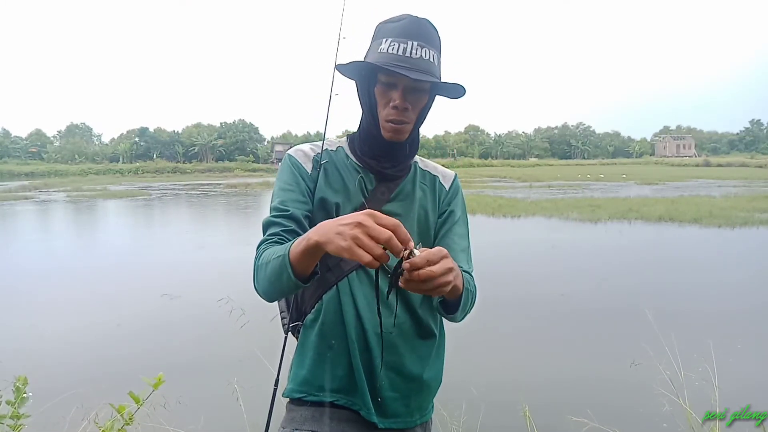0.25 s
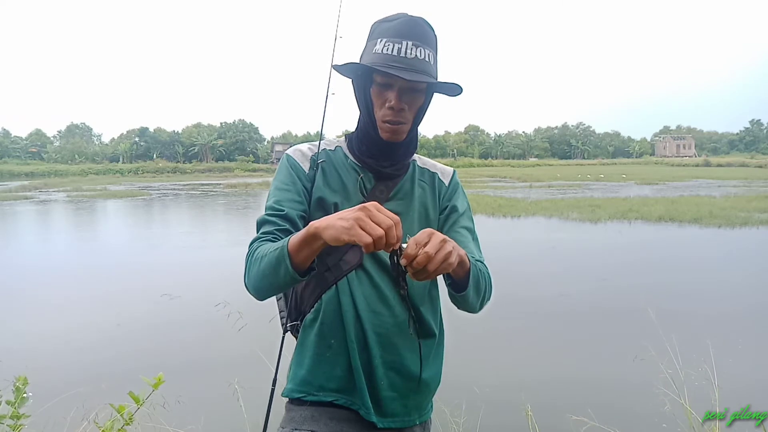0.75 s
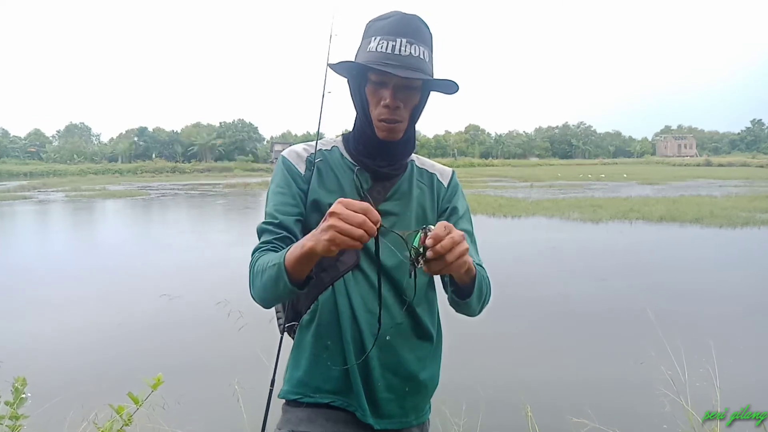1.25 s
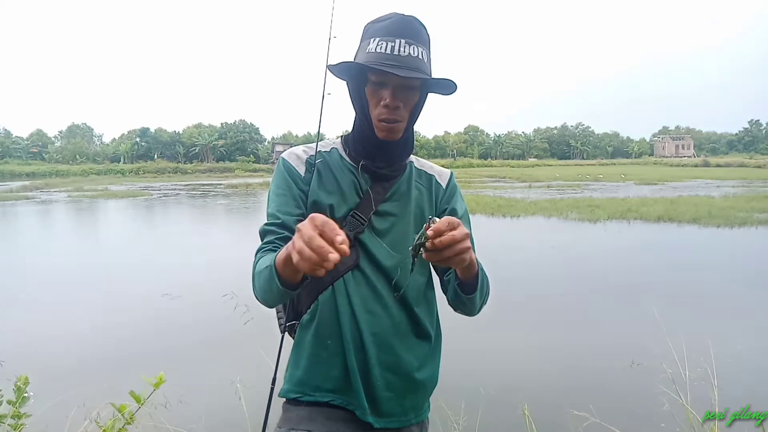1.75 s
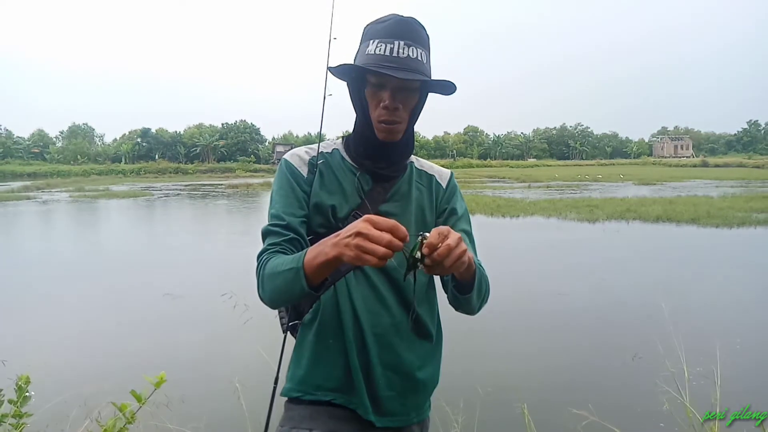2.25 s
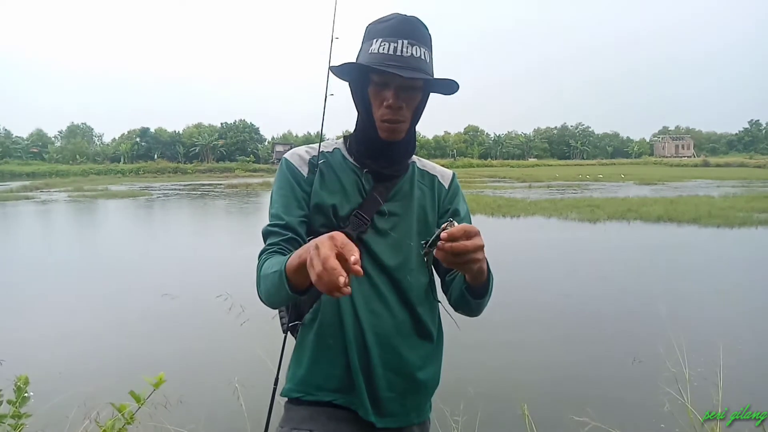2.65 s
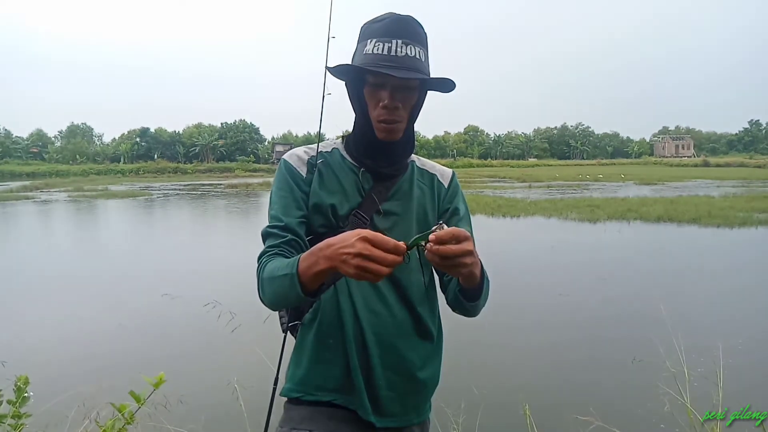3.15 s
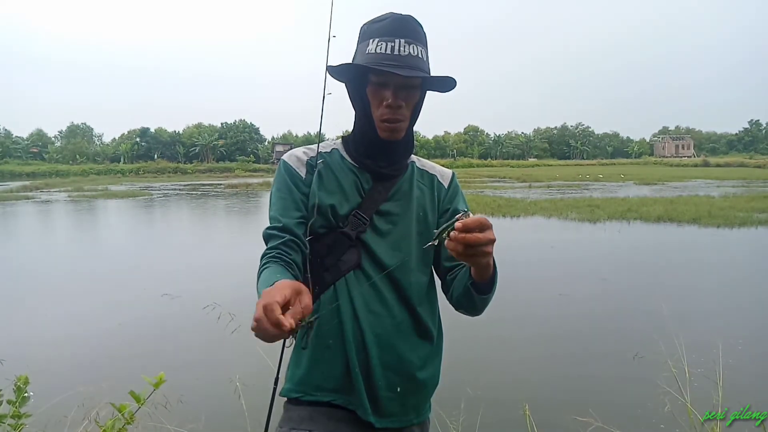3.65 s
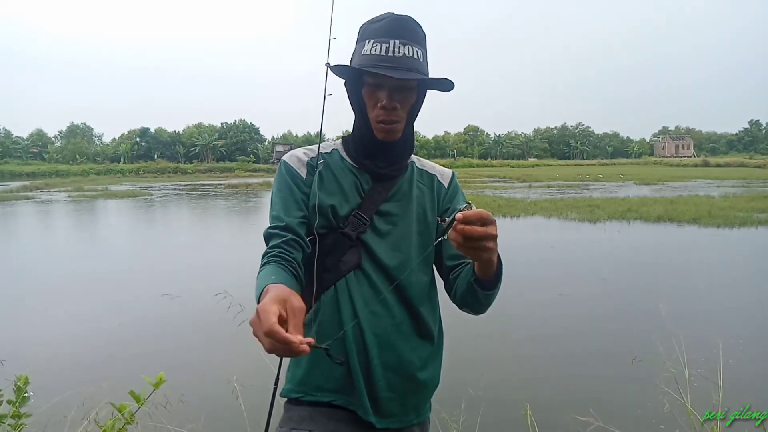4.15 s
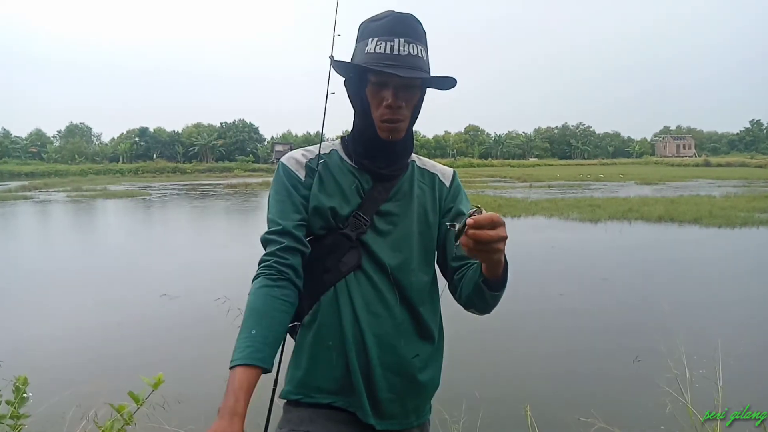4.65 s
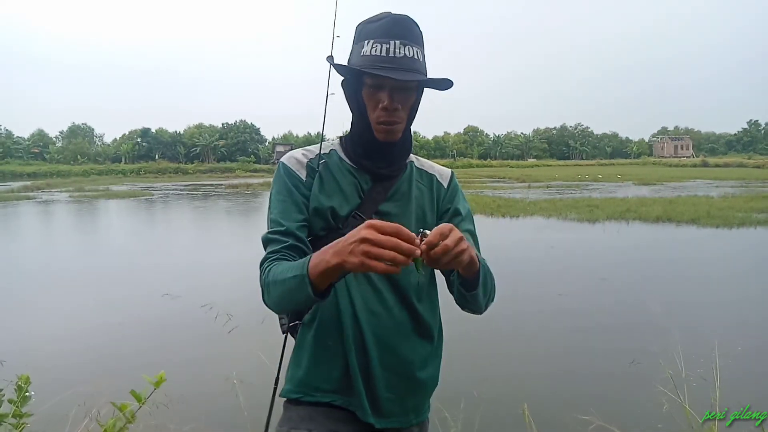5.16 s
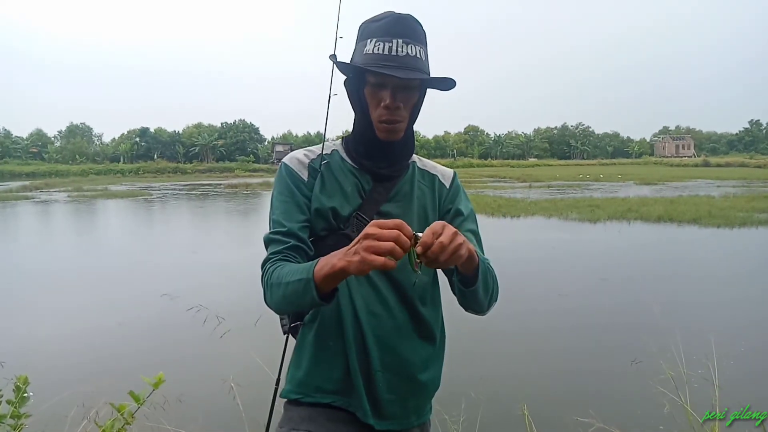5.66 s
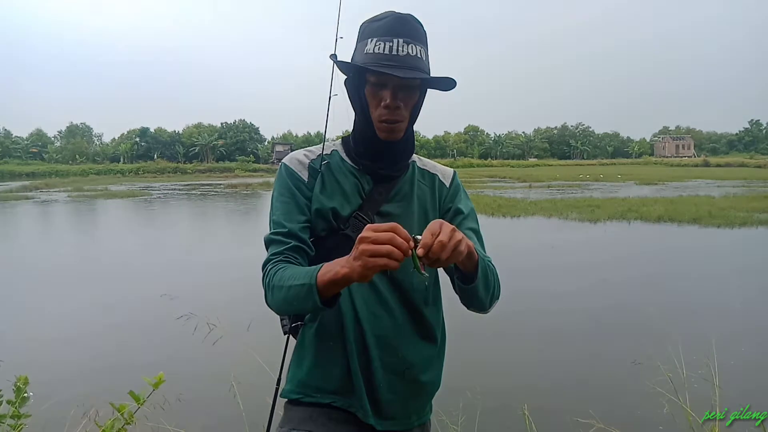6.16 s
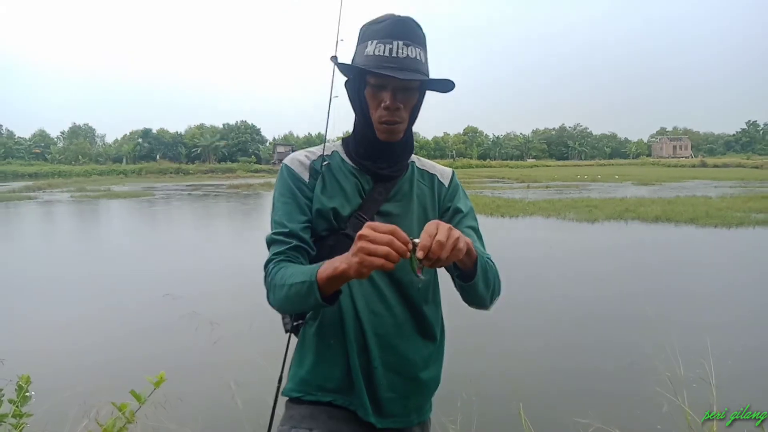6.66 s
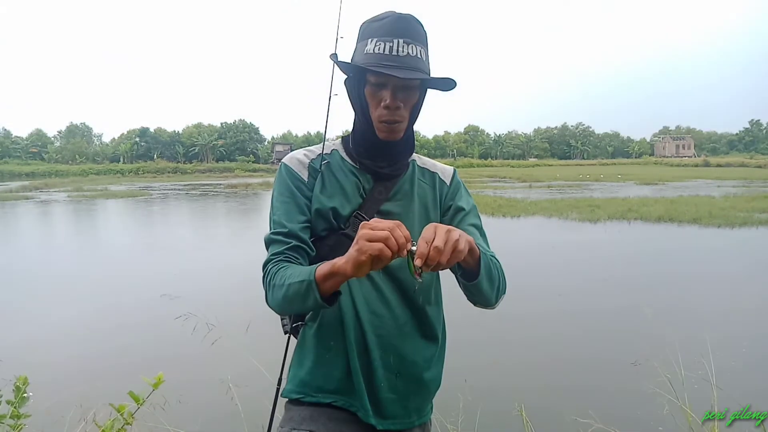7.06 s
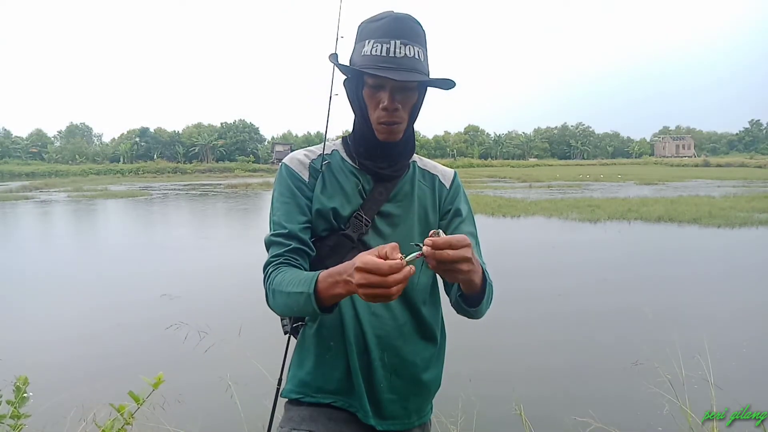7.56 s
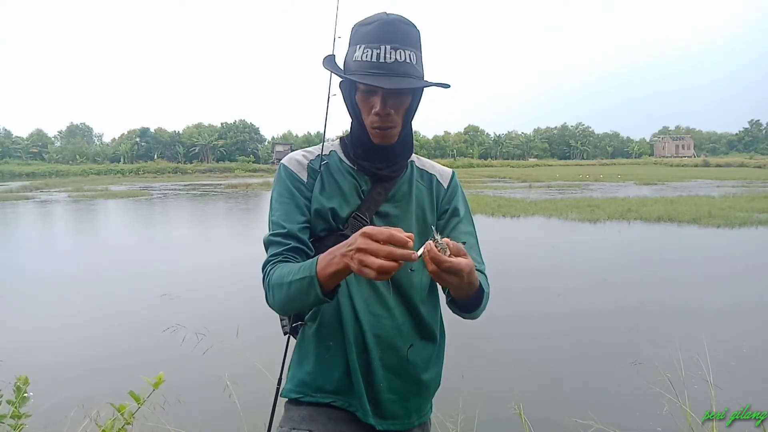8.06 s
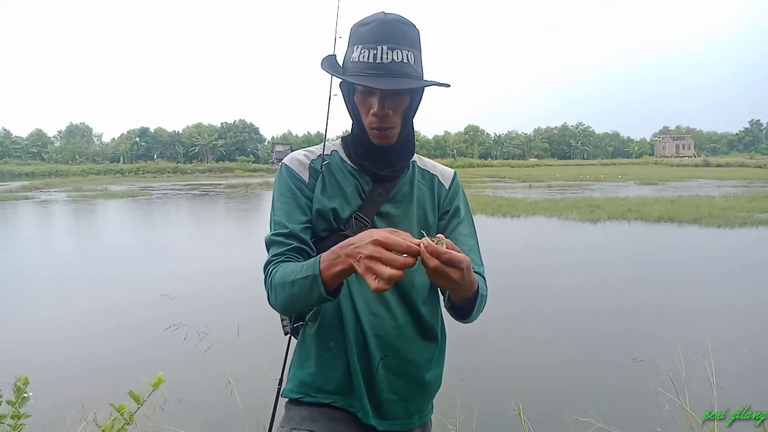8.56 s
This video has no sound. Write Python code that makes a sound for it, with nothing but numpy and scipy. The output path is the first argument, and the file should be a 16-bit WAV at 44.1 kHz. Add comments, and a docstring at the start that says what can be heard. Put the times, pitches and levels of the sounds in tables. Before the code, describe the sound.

Outdoors beside a pond, the nearest bird gives a long gliding whistle that rises at its end, answered by two quick dropping notes, about every 1.2 seconds. Between these, another bird chirps an arched note and an echoing rise and fall. A cricket trills in short runs over a thin high insect chorus. Low wind rumbles with occasional soft thumps at the microphone, and faint clicks and taps come from handled fishing tackle.

```python
"""Birdsong beside a pond

Birds, gliding sine tones with a noise-tail echo off the bank: a long swooping whistle answered by two quick
falling notes, arched notes that run on into a rise and fall or a twit, and one faint mew. A near cricket chirps in
paired tone strokes, mostly in runs that start slowly, over a far insect chorus of band-filtered noise.
Low wind rumbles as patchy noise with buffets; fishing tackle clicks and taps in the hands as short noise bursts."""
import sys
import numpy as np
from scipy import signal
from scipy.fft import rfft, irfft, next_fast_len
from scipy.io import wavfile
from scipy.ndimage import uniform_filter1d, map_coordinates

SR = 44100
rng = np.random.default_rng(int(sys.argv[2]) if len(sys.argv) > 2 else 0)


def waveform_to_disk(signal):
    """Save audio, clipped to [-1, 1], as 16-bit WAV at the path in sys.argv[1]."""
    frames = np.transpose(np.atleast_2d(signal))
    scaled = np.clip(frames, -1, 1) * 32767
    samples = np.round(scaled).astype(np.int16)
    wavfile.write(sys.argv[1], SR, samples)


N = 388521


def amp(db):
    """Decibels to gain."""
    return 10 ** (np.asarray(db) / 20)


def unit(x):
    """Scale to rms 1."""
    return x / np.sqrt(np.mean(x ** 2) + 1e-20)


def add(track, start_s, sound):
    """Mix a sound into the track in place, cropped to the track."""
    start = round(start_s * SR)
    sound = sound[max(0, -start):]
    place = track[max(0, start):][:len(sound)]
    place += sound[:len(place)]


def level(rows):
    """Gain per sample, interpolated in dB from (time [s], level [dB]) rows."""
    time_s, db = np.transpose(rows)
    return amp(np.interp(np.arange(N) / SR, time_s, db))


def wobble(rate_hz, size):
    """Smooth random curve: a spline through normal random knots at rate_hz."""
    knots = rng.standard_normal(int(size * rate_hz / SR) + 4)
    return map_coordinates(knots, [np.arange(size) * rate_hz / SR])


def coloured(x, spectrum):
    """Filter by (frequency [Hz], gain [dB]) points on a log-frequency axis."""
    size = next_fast_len(len(x) + 8192)
    hz, db = np.transpose(spectrum)
    bins_hz = np.fft.rfftfreq(size, 1 / SR)
    gain = amp(np.interp(np.log(bins_hz + 1), np.log(hz), db))
    return irfft(rfft(x, size) * gain, size)[:len(x)]


def rush(spectrum, patchy_db):
    """Coloured noise of rms 1 with brief time-frequency patches of random gain."""
    z = signal.stft(rng.standard_normal(N), nperseg=1024)[2]
    field = uniform_filter1d(rng.standard_normal(z.shape), size=4, axis=0)  # across frequency
    field = uniform_filter1d(field, size=7, axis=1)  # across time
    patchy = signal.istft(z * amp(patchy_db * unit(field)), nperseg=1024)[1][:N]
    return unit(coloured(patchy, spectrum))


def glide(shape, pitch_ratio, stretch, waver):
    """Pure tone along a (time [s], pitch [Hz], level [dB]) shape, with random pitch deviation scaled by waver."""
    time_s, hz, db = np.transpose(shape)
    time_s = np.maximum.accumulate(time_s) * stretch
    t = np.arange(int(time_s[-1] * SR)) / SR
    pitch_hz = uniform_filter1d(np.interp(t, time_s, hz), size=90)
    pitch_hz = pitch_hz * pitch_ratio * (1 + waver * wobble(148.1, len(t)))
    tone = np.sin(2 * np.pi * np.cumsum(pitch_hz) / SR)
    edges = signal.windows.tukey(len(t), 90 / len(t))
    return np.sqrt(2) * edges * amp(np.interp(t, time_s, db)) * tone


def outdoors(sound, wet_db, t60_s):
    """Direct sound plus its scatter from reeds and trees, a decaying noise tail."""
    t = np.arange(SR // 2) / SR
    tail = rng.standard_normal(len(t)) * amp(-60 * t / t60_s) * (1 - np.exp(-t / 0.0033))
    response = amp(wet_db) * tail / np.linalg.norm(tail)
    response[0] += 1
    return signal.fftconvolve(sound, response)


def sing(shape, notes, waver, wet_db, t60_s):
    """Repeat a shape at (start [s], level [dB], length [ratio]), pitch nearly fixed, strength fluttering."""
    track = np.zeros(N)
    for start_s, db, stretch in notes:
        note = glide(shape, 1 + .002 * rng.normal(), stretch, waver)
        note *= amp(2.14 * wobble(65.8, len(note)))
        add(track, start_s, amp(db) * outdoors(note, wet_db, t60_s))
    return track


def ticks(events, spectrum, attack_s, t60_s):
    """Small contacts at (time [s], peak [dB]), each a quickly dying coloured noise burst."""
    track, t = np.zeros(N), np.arange(SR // 8) / SR
    envelope = (1 - np.exp(-t / attack_s)) * amp(-60 * t / t60_s)
    for time_s, db in events:
        burst = coloured(rng.standard_normal(len(t)) * envelope, spectrum)
        add(track, time_s, amp(db) * burst / np.abs(burst).max())
    return track


def distance():
    """Faint wash of the open country, plus a hollow drone whose gain has Gaussian swells."""
    # wash level before the common lift: (time [s], level [dB])
    country = [(0.0, -57), (0.17, -59.5), (1.23, -57.5), (4.64, -57.5), (4.81, -61), (5.28, -55.5),
               (5.59, -60), (6.23, -58.5), (6.45, -55), (6.72, -53.5), (7.21, -59.5), (7.53, -59.5),
               (7.8, -55), (8.19, -54), (8.44, -59), (8.81, -54.5)]
    # drone swells, added to its floor: (middle [s], length [s], level [dB])
    swells = [(.14, 0.14, -50), (0.917, 0.29, -56.5), (1.517, 0.26, -65), (4.417, 0.47, -57.5),
              (5.178, 0.25, -69), (6.54, 0.26, -55), (7.69, 0.16, -65), (8.227, 0.29, -55.5)]
    # wash and drone spectra: (frequency [Hz], relative level [dB])
    air = [(200, -35), (750, -6), (950, -4.5), (1100, 0.5), (1350, 1.5), (1700, 1), (2400, 2), (3400, 1.5),
           (4200, -4.5), (5000, -41), (5400, -41), (8000, -84)]
    drone = [(300, -29), (440, -4.5), (510, 0), (560, -3), (620, -1), (700, -18), (1000, -69)]
    lift_db, flutter_db, drone_floor_db = 8.5, 1.7, -62.5
    t = np.arange(N) / SR
    drone_gain = amp(drone_floor_db)
    for middle_s, length_s, db in swells:
        drone_gain = drone_gain + amp(db) * np.exp(-(2 * (t - middle_s) / length_s) ** 2)
    wash_gain = amp(lift_db + flutter_db * wobble(22, N)) * level(country)
    return wash_gain * rush(air, patchy_db=4.0) + drone_gain * rush(drone, patchy_db=4.5)


def wind():
    """Low noise rumble with a higher eddy band riding on it, and buffets as 85 Hz pulses."""
    # common level of rumble and eddies: (time [s], level [dB])
    breeze = [(0.0, -32.5), (4.39, -33), (4.69, -32), (7.31, -33.5), (7.65, -31.5), (8.81, -32.5)]
    # buffets: (middle [s], envelope peak [dB])
    buffets = [(3.733, -13), (4.537, -18.5), (4.92, -20), (6.294, -16.5), (7.525, -18.5)]
    # rumble and eddy spectra: (frequency [Hz], relative level [dB])
    rumble = [(20, -32.5), (32, -24), (50, -15), (72, 1.5), (92, 0.5), (125, -2), (200, -12.5),
              (300, -26.5), (400, -43), (700, -59.5), (1500, -100)]
    eddy = [(170, -37), (240, 2), (300, -2.5), (340, -6.5), (400, -16.5), (520, -49)]
    rumble_db, eddy_db = 2, -17  # against the breeze
    eddies = amp(eddy_db) * rush(eddy, patchy_db=5)
    track = level(breeze) * (amp(rumble_db) * rush(rumble, patchy_db=1.2) + eddies)
    t = np.arange(-SR // 10, SR // 10) / SR
    for middle_s, db in buffets:
        push = np.exp(-(t / 0.0086) ** 2) * np.sin(2 * np.pi * (85 * t + rng.random()))
        add(track, middle_s + t[0], amp(db) * push)
    return track


def insects():
    """Far crickets merged into a flickering narrow noise band, a thin hiss, and shrill buzzes that swell and stop."""
    # shrill buzzes: (stop [s], final level [dB])
    buzzes = [(.38, -70.5), (1.85, -72.5), (2.96, -67), (4.12, -67.5), (5.33, -70.5), (6.53, -69),
              (7.62, -69), (8.77, -69)]
    # chorus, hiss and shrill spectra: (frequency [Hz], relative level [dB])
    chorus = [(3800, -39), (4450, -6), (4720, 0), (4870, 1), (5020, -7), (5180, -20), (5600, -57)]
    hiss = [(4000, -32), (5200, -7.5), (5750, -16), (6200, 0.5), (6800, 1.5), (7350, -0.5), (7900, -12),
            (8400, -3.5), (8900, 1), (9250, -4), (9850, -17), (11000, -20), (15500, -22)]
    thin = [(8500, -45), (9100, -2), (9400, -2), (9600, -6), (9900, -37)]
    buzz_s, buzz_swell_db = 0.95, 6
    far_crickets = amp(-53.0 + 1.15 * wobble(45, N)) * rush(chorus, patchy_db=2.5)
    swell = amp(np.linspace(-buzz_swell_db, 0, int(buzz_s * SR)))
    buzz_gain = np.zeros(N)
    for stop_s, db in buzzes:
        add(buzz_gain, stop_s - buzz_s, amp(db) * swell)
    shrill = uniform_filter1d(buzz_gain, size=900) * rush(thin, patchy_db=0.0)
    return far_crickets + amp(-63.5) * rush(hiss, patchy_db=2.2) + shrill


def handling():
    """Tackle in the hands: sharp clicks, and dull taps with slower attack and decay."""
    # clicks: (time [s], peak [dB])
    clicks = [(2.1176, -47), (4.2931, -36), (4.308, -38), (4.364, -41), (7.0454, -46), (7.817, -50)]
    # taps, before the common lift: (time [s], peak [dB])
    taps = [(1.0244, -40.5), (1.054, -45.5), (1.409, -39), (1.9572, -40), (2.1125, -42), (2.419, -48),
            (2.9607, -44.5), (4.0173, -45), (5.0455, -38.5), (5.414, -41), (6.2505, -41.5), (6.6573, -45),
            (7.5478, -39.5)]
    # click and tap spectra: (frequency [Hz], relative level [dB])
    tackle = [(600, -8), (2000, 14), (4500, -15), (7500, 6), (9500, -6), (15000, -19)]
    tap = [(300, -16), (800, -10), (1400, 5), (2200, 3.5), (3400, -1.5), (4800, -18), (5400, -35),
           (12000, -69)]
    tap_lift_db = 9
    sharp = ticks(clicks, tackle, attack_s=.0003, t60_s=0.009)
    return sharp + amp(tap_lift_db) * ticks(taps, tap, attack_s=.0012, t60_s=0.065)


def mewing_bird():
    """One faint call from far away, a tone sinking in pitch."""
    # call shape at length ratio 1: (time [s], pitch [Hz], level [dB])
    mew = [(0, 1176, -18), (.05, 1140, -12), (.13, 1060, -5.5), (.22, 1000, -4)]
    # calls: (start [s], level [dB], length [ratio])
    mews = [(5.78, -48.5, 0.85)]
    return sing(mew, mews, waver=0.014, wet_db=-11, t60_s=0.49)


def chirp(pitch_ratio, stretch):
    """Two wing strokes, each a tone that swells and fades as its pitch sags ever faster."""
    start_hz, sag_hz, edge_db = 4878, 670, -17
    first_s, second_s, onset_gap_s = 0.01094, 0.0139, .012
    u = np.linspace(0, 1, 12)  # position in the stroke
    stroke = np.transpose([u, start_hz - sag_hz * u ** 2.23, edge_db * (2 * u - 1) ** 4])
    sound = np.zeros(SR // 20)
    add(sound, 0, glide(stroke, pitch_ratio, first_s * stretch, waver=0.012))
    add(sound, onset_gap_s * stretch, glide(stroke, pitch_ratio, second_s * stretch, waver=0.0071))
    return sound


def cricket():
    """Near cricket: each run starts soft and a little flat, usually slow, then settles to a steady beat."""
    # runs: (first chirp [s], chirps [count], steady gap [s], time lost in the slow start [s])
    runs = [(0.006, 3, 0.0453, 0.0), (0.408, 20, 0.0412, 0.044), (1.446, 24, 0.0403, 0.054),
            (2.693, 2, 0.0816, 0.0), (2.914, 25, 0.0408, 0.06), (3.996, 3, 0.0455, 0.0),
            (4.346, 1, 0.06, 0.0), (4.489, 24, 0.0404, 0.076), (5.536, 12, 0.0461, -0.007),
            (6.293, 4, 0.057, 0.0), (6.574, 22, 0.0402, 0.019), (7.725, 1, 0.06, 0.0),
            (7.861, 23, 0.0406, 0.053)]
    warm_up_chirps = 6
    warm_db, cold_db, uneven_db = -40.5, -2, 0.33  # warmed up; extra at run start; random swing
    track = np.zeros(N)
    for start_s, count, gap_s, lost_s in runs:
        for k in range(int(count)):
            cold = max(0, 1 - k / warm_up_chirps) ** 2
            sound = chirp(1 - .012 * cold + .004 * rng.normal(), 1 + .1 * cold)
            effort_db = warm_db + cold_db * cold + uneven_db * wobble(70, len(sound))
            chirp_s = start_s + k * gap_s + lost_s * (1 - cold)
            add(track, chirp_s, amp(effort_db) * sound)
    return outdoors(track, wet_db=-10, t60_s=0.49)[:N]


def arching_birds():
    """Songs of a clean arched tone, then a wavering, more echoing rise and fall, or a twit."""
    # note shapes at length ratio 1: (time [s], pitch [Hz], level [dB])
    arch = [(0, 1850, -16), (.015, 2480, -11), (.028, 2595, -4), (.057, 2600, 0), (.066, 2460, -2),
            (.08, 2050, -5), (.095, 1800, -20)]
    rise = [(0, 2360, -19), (.012, 2885, -0.5), (.022, 3350, -5.5), (.032, 3620, -2)]
    fall = [(0, 5747, -21), (.014, 5250, -18), (.02, 4334, -4.5), (.03, 3920, -2.5), (.045, 3350, 0.5),
            (.06, 3195, -1.5), (.075, 3360, -45)]
    twit = [(0, 3000, -12), (.012, 3320, -2.5), (.022, 3650, -11), (.034, 4100, -40), (.056, 4700, -14),
            (.07, 3950, -7.5), (.085, 3550, -7), (.1, 3620, -16)]
    # arch, rise and fall: (start [s], level [dB], arch length [ratio], arch to rise [s])
    arch_songs = [(0.526, -40, 0.97, 0.15), (1.617, -38.5, 0.95, .141), (2.479, -37.5, .91, 0.14),
                  (3.514, -37.5, 1, .139), (4.579, -39, 1, 0.13), (5.468, -39.5, 1.02, .14),
                  (6.709, -37, 1.01, .141), (7.942, -38, 0.98, 0.14)]
    # arch and twit: (start [s], level [dB], arch length [ratio])
    twit_songs = [(1.46, -39, 1.05), (4.07, -39.5, .8)]
    rise_db, fall_db, twit_db = -1.5, -4, 8  # against the arch
    rise_to_fall_s, arch_to_twit_s, fall_stretch = .047, .14, .92
    arches, rises, falls, twits = [], [], [], []
    for start_s, db, stretch, after_s in arch_songs:
        rise_s = start_s + after_s
        arches.append((start_s, db, stretch))
        rises.append((rise_s, db + rise_db, 1))
        falls.append((rise_s + rise_to_fall_s, db + fall_db, fall_stretch))
    for start_s, db, stretch in twit_songs:
        arches.append((start_s, db, stretch))
        twits.append((start_s + arch_to_twit_s, db + twit_db, 1))
    track = sing(arch, arches, waver=.004, wet_db=-2.0, t60_s=0.3)
    track += sing(rise, rises, waver=0.065, wet_db=3, t60_s=0.17)
    track += sing(fall, falls, waver=.018, wet_db=6.5, t60_s=.34)
    return track + sing(twit, twits, waver=0.0215, wet_db=0, t60_s=0.38)


def whistling_bird():
    """Nearest singer: a clear gliding whistle, a pause, then two falling notes, hurried after a long whistle."""
    # note shapes at length ratio 1: (time [s], pitch [Hz], level [dB])
    whistle = [(0, 2290, -25), (.005, 3480, -12), (.012, 4663, -27), (.04, 3544, -16), (.075, 3120, -21.5),
               (0.151, 3007, -14), (.225, 3180, -9), (.266, 3353, -2.5), (.287, 3538, -2.5),
               (.302, 3430, -30)]
    chip = [(0, 2950, -16), (.003, 2850, 0), (.011, 2600, -3), (.025, 2050, -14), (.033, 1600, -35)]
    chew = [(0, 1750, -18), (.011, 2350, -8), (.019, 2760, 0), (.026, 2720, 1), (.034, 2450, -6),
            (.046, 2150, -8), (.064, 1800, -12), (.074, 1600, -30)]
    # songs: (start [s], level [dB], whistle length [ratio], pause before the chip [s])
    songs = [(-.34, -29, 0.97, 0.034), (1.02, -26.5, 1.033, 0.037), (2.237, -27, 0.99, 0.052),
             (3.442, -27, 1.03, .044), (4.686, -25.5, .99, .05), (5.993, -26, 1.09, .051),
             (7.259, -25.5, 1.065, 0.047), (8.586, -27, 1.12, .05)]
    answer_db, chip_to_chew_s = -10, 0.043  # level against the whistle; gap at length ratio 1
    whistles, chips, chews = [], [], []
    for start_s, db, stretch, pause_s in songs:
        chip_s = start_s + whistle[-1][0] * stretch + pause_s
        hurry = 1 / stretch
        whistles.append((start_s, db, stretch))
        chips.append((chip_s, db + answer_db, hurry))
        chews.append((chip_s + chip_to_chew_s * hurry, db + answer_db, hurry))
    track = sing(whistle, whistles, waver=.004, wet_db=-6, t60_s=.42)
    track += sing(chip, chips, waver=0.0088, wet_db=-1.5, t60_s=0.25)
    return track + sing(chew, chews, waver=0.0093, wet_db=0, t60_s=0.26)


def scene():
    """Everything heard from the bank, in mono."""
    background = distance() + wind() + insects() + handling()
    birds = mewing_bird() + arching_birds() + whistling_bird()
    return (background + cricket() + birds)[None]


def record(dry):
    """Remove everything from the band limit up."""
    top_hz = 15500
    size = next_fast_len(N + 8192)
    keep = np.fft.rfftfreq(size, 1 / SR) < top_hz
    return irfft(rfft(dry, size) * keep, size)[:, :N]


dry = scene()
out = record(dry)
waveform_to_disk(out)
```